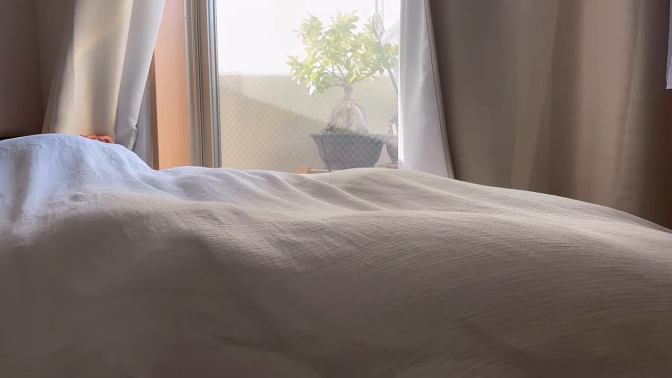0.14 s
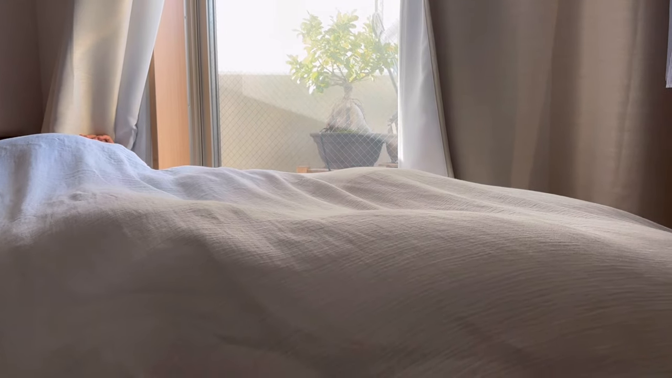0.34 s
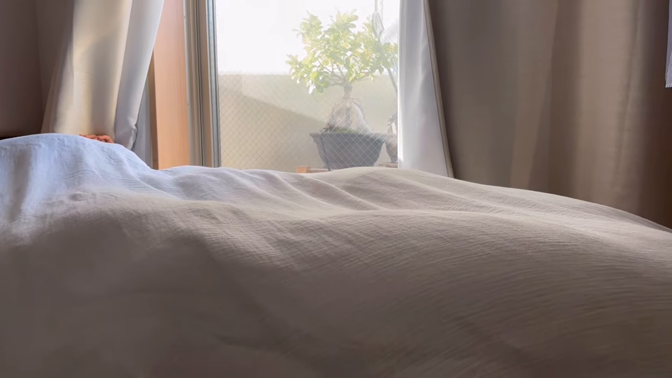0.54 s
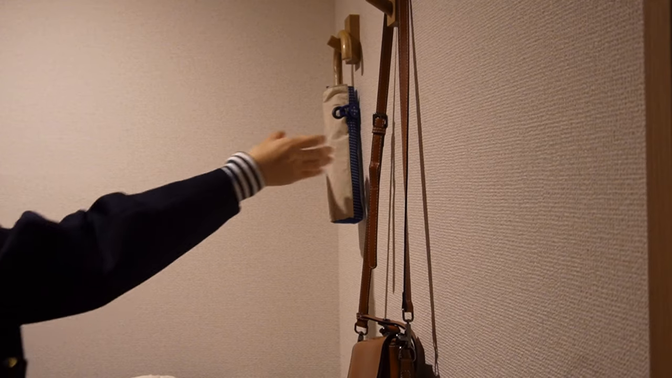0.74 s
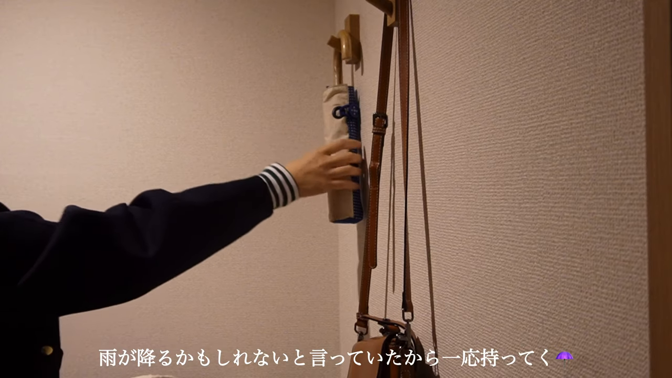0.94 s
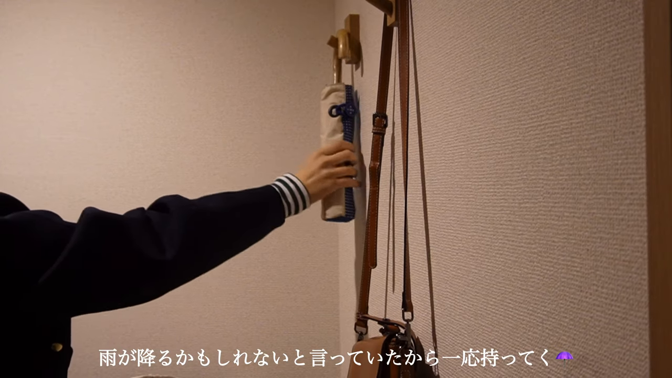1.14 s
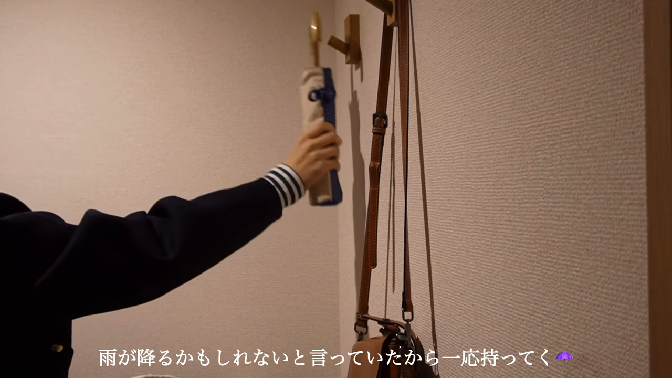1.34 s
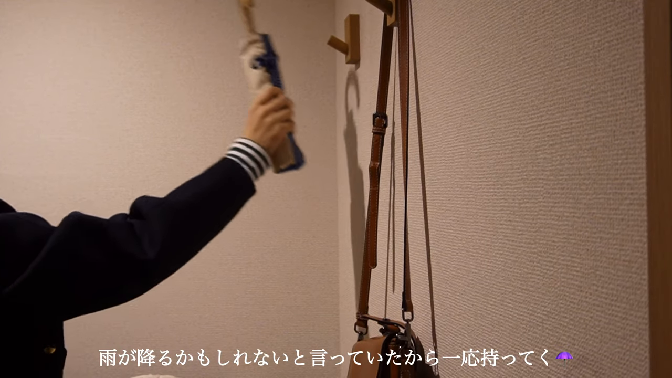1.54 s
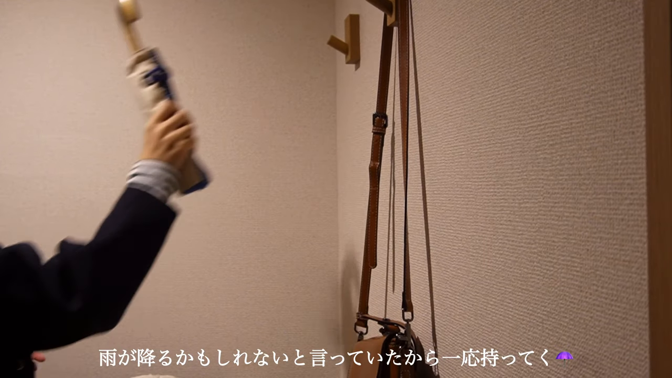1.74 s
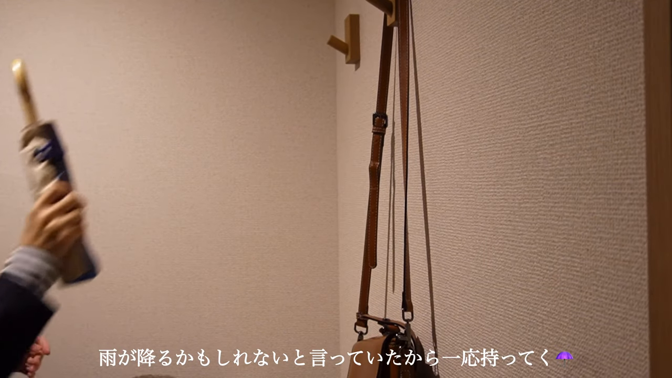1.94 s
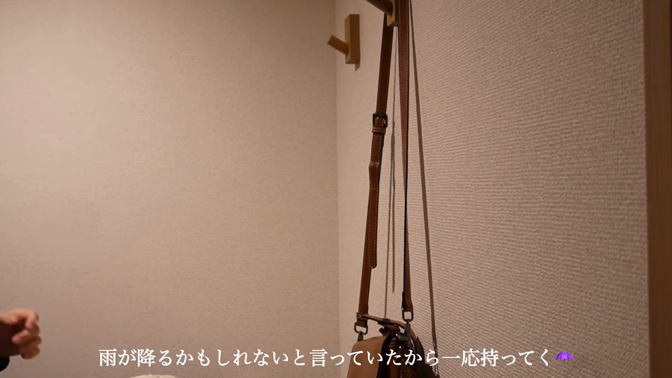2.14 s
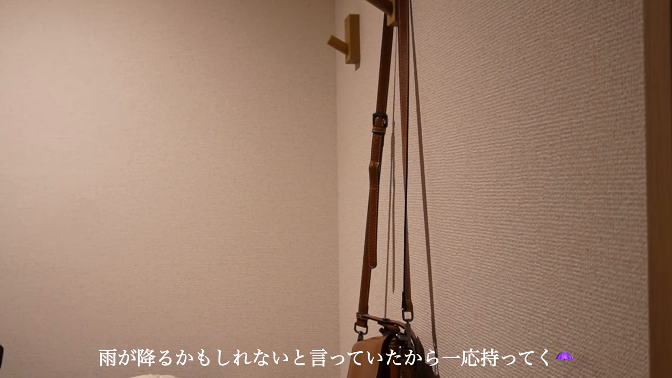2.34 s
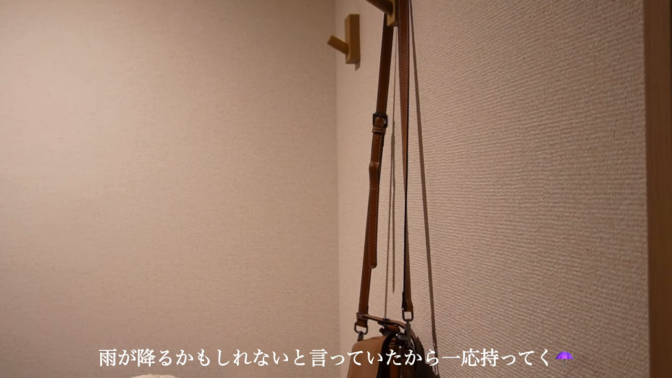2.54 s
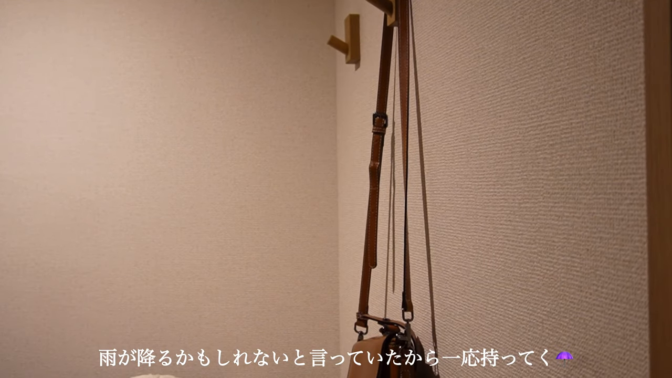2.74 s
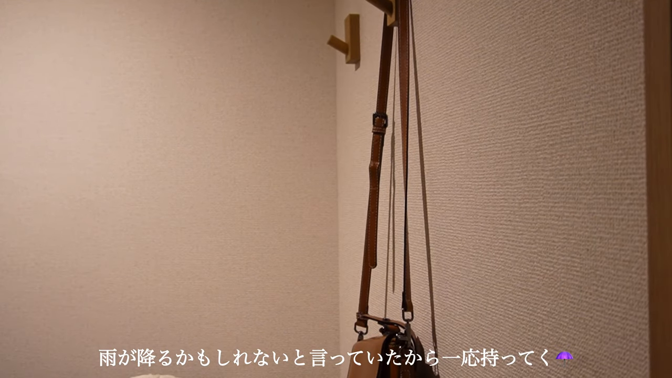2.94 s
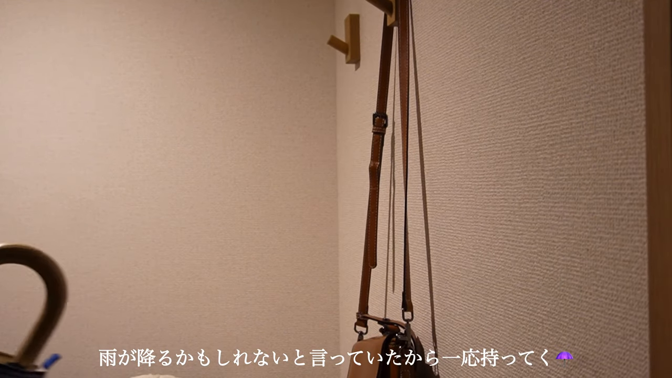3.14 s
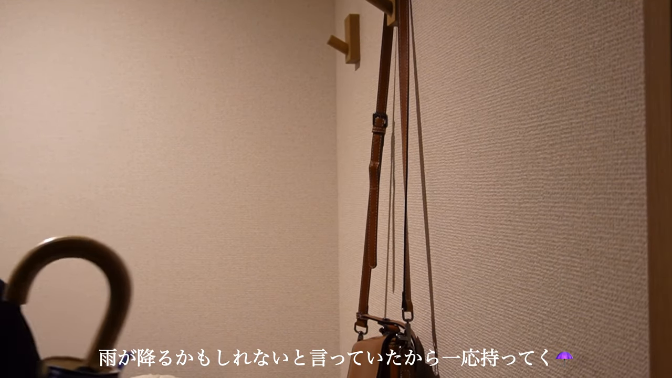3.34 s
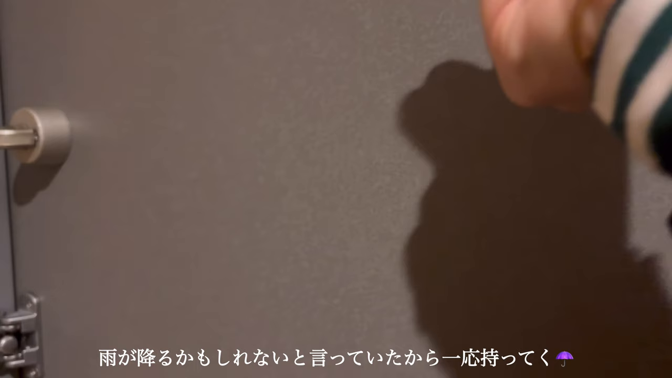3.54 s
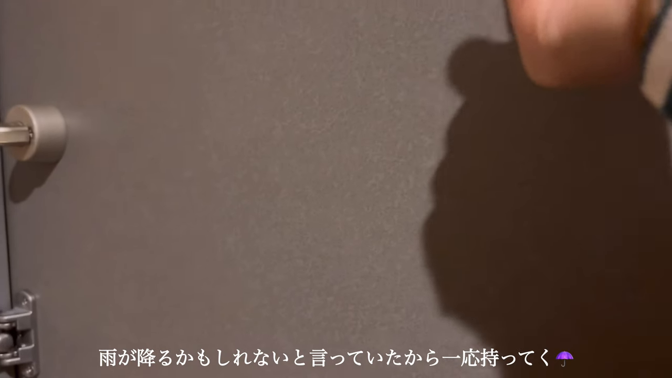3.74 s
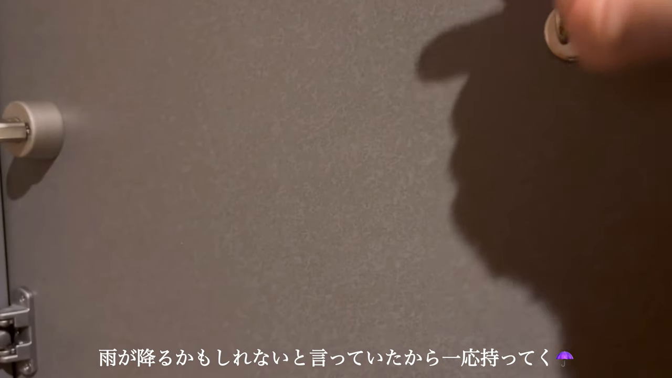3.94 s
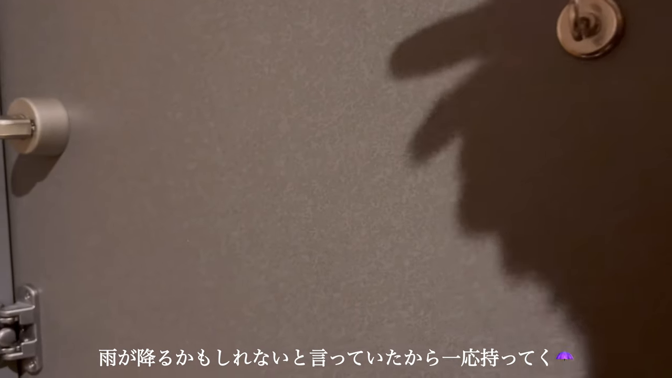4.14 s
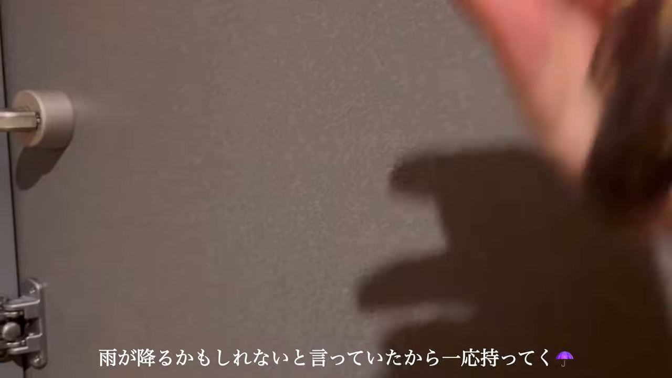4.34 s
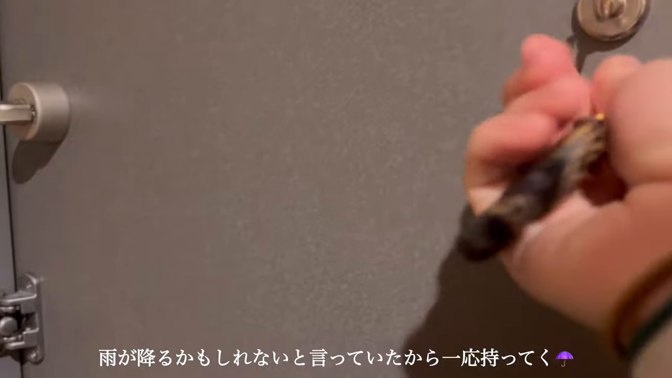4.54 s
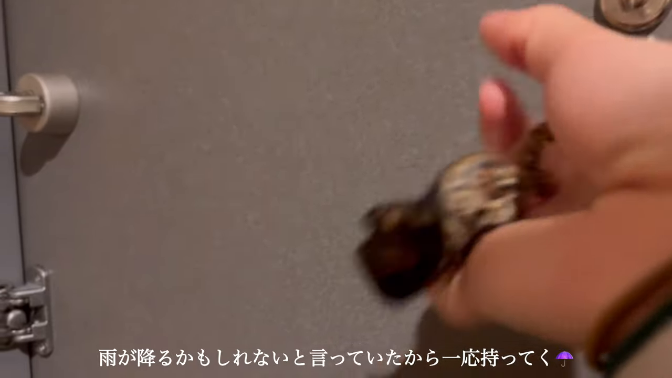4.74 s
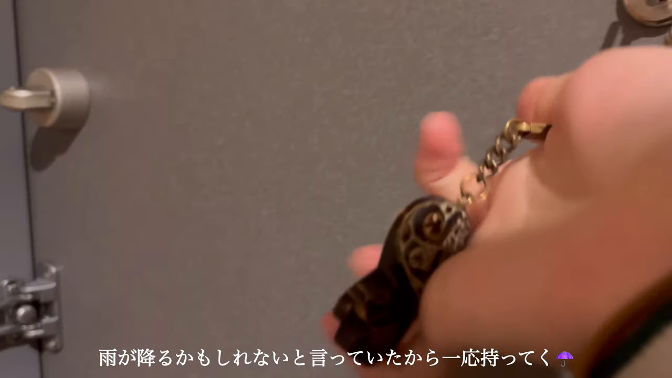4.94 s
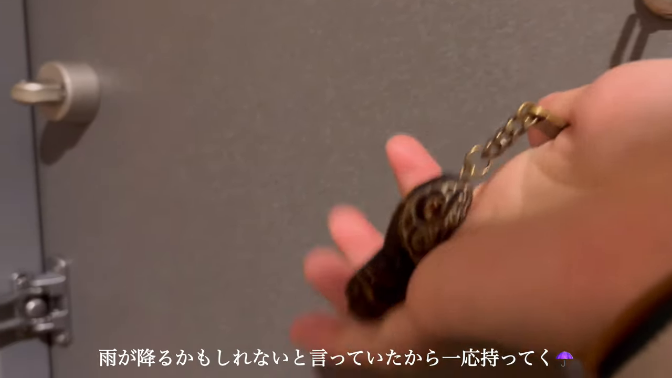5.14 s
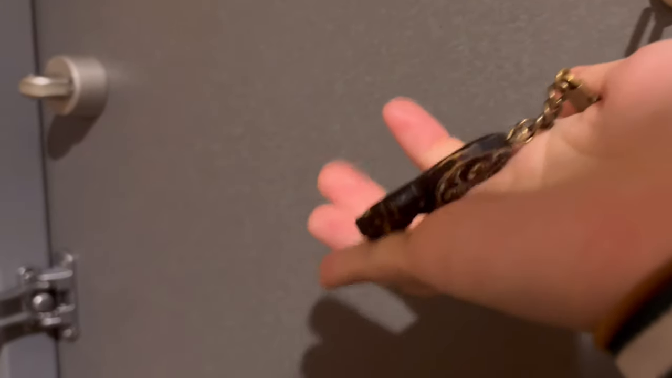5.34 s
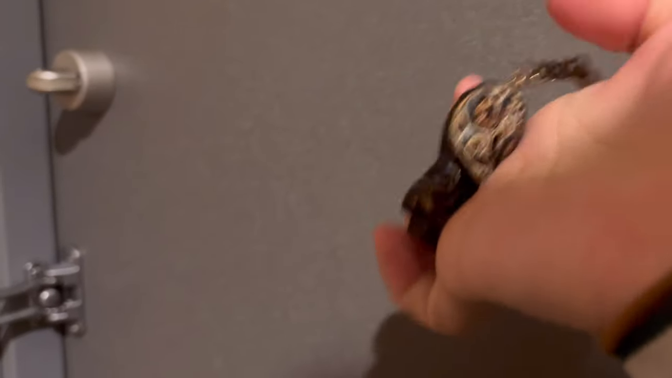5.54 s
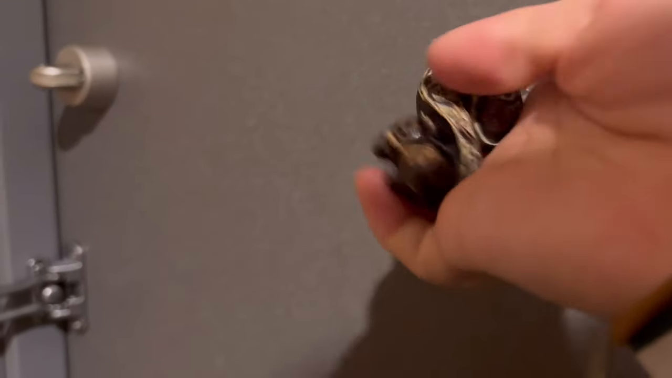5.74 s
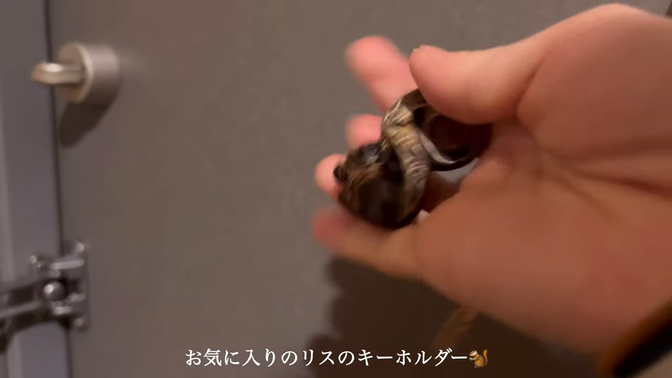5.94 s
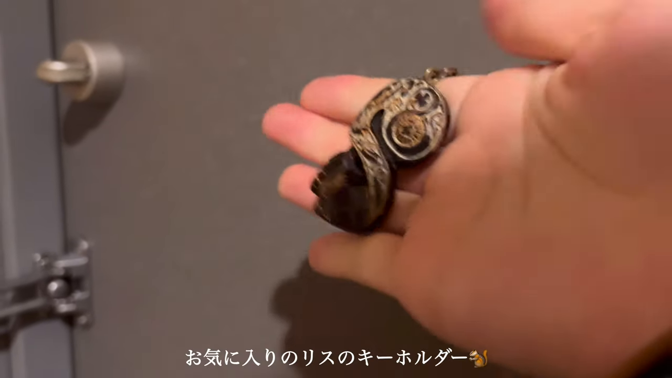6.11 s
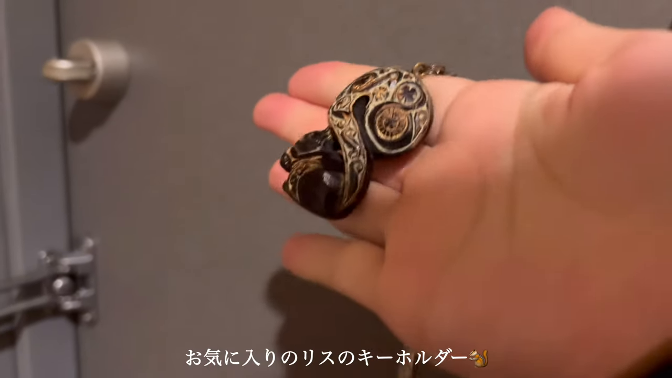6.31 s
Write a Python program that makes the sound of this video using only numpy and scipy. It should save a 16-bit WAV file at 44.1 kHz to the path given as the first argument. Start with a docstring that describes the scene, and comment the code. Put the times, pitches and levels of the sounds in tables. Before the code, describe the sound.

Inside a home, over a faint low rumble, cloth rubs and the floor thuds softly as someone moves and takes an umbrella off a wooden peg with a clack. At the front door, a bolt knocks and scrapes in its lock. Keys and their chain jingle in a hand near the microphone. The steel door gives a single booming bang, the loudest sound, and the keys rattle briefly, ending in tiny ticks.

```python
"""A home, in three scenes over a wavering low rumble. First a quiet bedroom. Then a hallway, where a
coat rustles, the floor answers a moving person and an umbrella taps a wooden peg as it is lifted off.
Last a steel front door: the turning lock knocks and scrapes, a bunch of keys jangles in the hand
close by, and a bang sets the whole door ringing."""
import sys
import numpy as np
from scipy import signal
from scipy.fft import rfft, irfft, next_fast_len
from scipy.io import wavfile
from scipy.ndimage import uniform_filter1d

SR = 44100
rng = np.random.default_rng(int(sys.argv[2]) if len(sys.argv) > 2 else 0)


def persist_wave(psi):
    """Save psi, clipped to +-1, as 16-bit WAV."""
    counts = np.round(np.clip(psi, -1, 1) * 32767).astype(np.int16)
    wavfile.write(sys.argv[1], SR, np.atleast_2d(counts).T)


N = 285327
T = np.arange(N) / SR


def gain(db):
    return 10 ** (np.asarray(db) / 20)


def set_level(x, db):
    return x * gain(db) / np.sqrt(np.mean(x ** 2))


def add(out, start_s, x):
    i = int(start_s * SR)
    out[..., i:i + x.shape[-1]] += x[..., :N - i]


def over_time(rows):
    """Join a table's points with straight lines, one curve per column."""
    times, *columns = np.transpose(rows)
    return [np.interp(T, times, column) for column in columns]


def at_pitch(table, hz):
    """Read between a table's frequencies, with octaves evenly spaced."""
    freqs, values = np.transpose(table)
    return np.interp(np.log(hz), np.log(freqs), values)


def wander(per_s):
    """A smooth random wobble."""
    hold = int(SR / per_s)
    steps = np.repeat(rng.standard_normal(N // hold + 1), hold)
    return uniform_filter1d(uniform_filter1d(steps, hold), hold)[:N]


def noise_bands(size, spread):
    """Half-octave slices of noise; spread(hz) sets how unlike left and right are."""
    n = next_fast_len(size)
    spectrum = rfft(rng.standard_normal((2, n)))
    freqs = np.arange(n // 2 + 1) * SR / n + 1
    for hz in 25 * 2 ** (np.arange(20) / 2):
        window = np.cos(np.pi * np.clip(np.log2(freqs / hz), -.5, .5)) ** 2
        mid, side = irfft(spectrum * window, n)[:, :size]
        yield hz, mid + spread(hz) * side * np.array([[1], [-1]])


def shaped_noise(tone, spread, flicker_db, level_db=lambda hz: 0):
    """Noise of strength 1 whose bands each flicker, then follow level_db(hz)."""
    parts = [(hz, x * gain(at_pitch(tone, hz) + flicker_db * wander(9)))
             for hz, x in noise_bands(N, spread)]
    strength = np.sqrt(np.mean(sum(x for _, x in parts) ** 2))
    return sum(x * gain(level_db(hz)) for hz, x in parts) / strength


def band(x, hz, width_hz):
    """Keep the sound near one pitch; filtering twice cuts more steeply."""
    peak = signal.iirpeak(hz, hz / width_hz, SR)
    return signal.lfilter(*peak, signal.lfilter(*peak, x))


def ring(tones, seconds, scatter_db):
    """The fading tones of a struck object. A fade time is how long a 60 dB drop takes."""
    t = T[:int(seconds * SR)]
    hz, db, fade_s = np.transpose(tones)[:, :, None]
    db = db + scatter_db * rng.standard_normal(hz.shape)
    sign = (-1) ** np.arange(len(tones))[:, None]  # neighbours swing opposite ways
    onset = 1 - np.exp(-hz * t)
    return np.sum(sign * gain(db - 60 * t / fade_s) * onset * np.sin(2 * np.pi * hz * t), 0)


def burst(fade_s):
    """A quick puff of noise whose energy depends only on its length."""
    fade = gain(-60 * np.arange(int(fade_s * SR)) / (fade_s * SR))
    puff = rng.standard_normal(len(fade)) * fade
    return puff * np.sqrt(np.sum(fade ** 2) / np.sum(puff ** 2))


def grit(depth_db, per_s):
    """Noise broken into tiny uneven slips."""
    hold = int(SR / per_s)
    slips = np.repeat(rng.exponential(size=N // hold + 1), hold)[:N]
    return set_level(rng.standard_normal(N) * gain(depth_db * np.minimum(slips, 4)), 0)


def swells(peaks, rise_db_s, fall_db_s, rest_db):
    """A resting level in dB, plus peaks that rise and fall at set speeds."""
    power = gain(rest_db) ** 2
    for s, db in peaks:
        power = power + gain(db - np.where(T < s, rise_db_s * (s - T), fall_db_s * (T - s))) ** 2
    return 10 * np.log10(power)


# How loud the rumble is: t/s, level/dB
RUMBLE_LEVELS = [(0, -64), (0.22, -65), (0.44, -70), (0.62, -64), (3.5, -55.5), (4.2, -44), (4.6, -47.5),
                 (5, -55), (5.6, -59), (6.2, -65), (6.45, -51)]
def rumble():
    """A deep rumble that wavers under all three scenes."""
    tone = [(25, -23), (60, 3), (110, 4.5), (200, -41)]  # f/Hz, level/dB
    level_db, = over_time(RUMBLE_LEVELS)
    return shaped_noise(tone, lambda hz: .35, .79, lambda hz: level_db)


# The bedroom air's mix of low and high: f/Hz, level/dB
BEDROOM_TONE = [(15, -38), (25, -28), (59, -2), (93, -18.5), (363, -25.5), (1860, -52), (15000, -82)]
def bedroom_air(start_db=-62, rise_db_s=10):
    """A faint, low hush that grows louder."""
    return shaped_noise(BEDROOM_TONE, lambda hz: .5, .75, lambda hz: start_db + rise_db_s * T)


# The cloth's mix of low and high: f/Hz, level/dB
CLOTH_TONE = [(240, -26), (400, -10.5), (1500, -2), (1690, -0.5), (2410, 1), (5200, 0), (10500, -17.5),
              (15700, -33.5)]
# The coat's movements: t/s, level/dB, brightening/dB
COAT_MOVES = [(0.69, -32, -4), (0.8, -30.5, -3.5), (0.98, -34.5, -4), (1.13, -31, -7), (1.22, -35, 0),
              (1.32, -37, -11), (1.5, -46, -5.5), (1.7, -42, -5), (1.89, -34, -0.5), (1.97, -34.5, 12),
              (2.09, -34.5, 4), (2.14, -40, 0), (2.22, -36.5, -6.5), (2.38, -45.5, -3), (2.5, -40, -4.5),
              (2.92, -36.5, -0.5), (3.15, -40, -4), (3.4, -36, -3.5), (3.5, -43.5, -3)]
def coat_rustle():
    """Cloth rubs, brighter when faster; fast strokes catch on the weave and scratch."""
    cloth_db, bright_db = over_time(COAT_MOVES)
    share = [(2500, .17), (6000, 1.18), (15000, 0)]  # f/Hz, share of the brightening
    rub = shaped_noise(CLOTH_TONE, lambda hz: .29 + hz / 30000, 1,
                       lambda hz: cloth_db + bright_db * at_pitch(share, hz))
    rub *= gain(1.02 * wander(150))
    slips = grit(3.1, 760)
    scratch = band(slips, 5450, 1900) + band(slips, 2360, 330) + gain(-14.5) * band(slips, 12600, 1500)
    return rub + gain(cloth_db + 2 * bright_db - 5.5) * scratch


# The low sound of floor and walls: f/Hz, level/dB
FLOOR_TONE = [(18, -36), (30, -16), (86, -4), (136, -2.5), (188, 6.5), (323, -4), (900, -10.5),
              (1170, -10.5), (1980, -120)]
# The person shifts weight: t/s, level/dB
WEIGHT_SHIFTS = [(1.0, -35.5), (1.1, -36), (1.3, -33), (1.97, -35.5), (2.45, -43)]
def floor_and_walls():
    """Floor and walls answer a moving person, swelling at each shift of weight."""
    level_db = swells(WEIGHT_SHIFTS, rise_db_s=192, fall_db_s=100, rest_db=-45.5)
    return shaped_noise(FLOOR_TONE, lambda hz: .2, 4.5, lambda hz: level_db)


def hallway_hiss():
    """A steady high hiss with a faint, thin whine."""
    hiss = set_level(band(rng.standard_normal((2, N)), 10000, 9000), db=-59)
    whine = set_level(band(rng.standard_normal(N), 10600, 60), db=-68)
    return hiss + whine


# The umbrella hits peg and wall: t/s, level/dB, extra treble/dB
UMBRELLA_TAPS = [(0.954, -31.5, 1), (1.046, -28, -7), (1.261, -18, 4.5), (3.19, -43.5, 8.5)]
# The wooden peg's tones: f/Hz, level/dB, fade/s
PEG_TONES = [(127.5, 5.5, 0.16), (243.7, 1, 0.32)]
def umbrella_taps():
    """Each tap rings the peg and adds a clack and a short click."""
    out = np.zeros(N)
    for s, db, treble_db in UMBRELLA_TAPS:
        add(out, s, gain(db - 4.5) * ring(PEG_TONES, .4, scatter_db=2))
        add(out, s, gain(db + treble_db + 8) * band(burst(.12), 1045, 1140))
        add(out, s, gain(db + treble_db + 12.5) * band(burst(.013), 1560, 1540))
    return out


# The doorway air's mix of low and high: f/Hz, level/dB
DOORWAY_TONE = [(15, -33), (25, -10), (95, -3), (184, -2), (266, -12.5), (767, -19.5), (9000, -56.5),
                (11700, -81), (19800, -120)]
def doorway_air():
    """The steady hush of still air by the front door."""
    return gain(-49.5) * shaped_noise(DOORWAY_TONE, lambda hz: .5, flicker_db=1.3)


# The steel door's main tones: f/Hz, level/dB, fade/s
DOOR_TONES = [(83.3, -5, 0.72), (146.8, -11, 0.97), (175.9, -6.5, 1), (205.5, -3.5, 0.87),
              (379.8, -0.5, 0.42), (434.4, -7.5, 0.43), (525.5, -0.5, 0.23), (870, -12, 0.34),
              (1002, -6, 0.18)]
# The boom of its many other tones and the stairwell: f/Hz, level/dB
BOOM_TONE = [(25, -46), (60, -10.5), (186, -6.5), (300, -6.5), (520, -10.5), (1010, -9.5), (1710, -26),
             (4090, -41), (8000, -53.5)]
# How long the boom lasts: f/Hz, fade/s
BOOM_FADES = [(60, 1.97), (160, 0.88), (420, 0.54), (1100, 0.24), (2910, 0.45)]
# The bolt's knocks, then the bang: t/s, level/dB, extra metal clash/dB
DOOR_BLOWS = [(3.554, -16.5, -21.5), (3.647, -14.5, -18), (3.679, -23.5, -28), (3.725, -15, -18),
              (3.754, -15, -13), (3.789, -16.5, -21), (3.864, -17.5, -8.5), (3.884, -16.5, -11),
              (3.909, -25.5, -30), (5.644, -1.5, -10), (5.649, -14, -20), (5.679, -23, -30),
              (5.724, -23, -38)]
def door_blows(push_samples=14):
    """Blows make the door ring and boom, the bass longest. Also returns their clash for the lock."""
    tail = sum(x * gain(at_pitch(BOOM_TONE, hz) - 60 * T[:SR] / at_pitch(BOOM_FADES, hz))
               for hz, x in noise_bands(SR, lambda hz: min(.12 + hz / 900, .9)))
    pushes, ringing, clash = np.zeros((3, N))
    for s, db, clash_db in DOOR_BLOWS:
        sign = rng.choice([-1, 1])
        add(pushes, s, gain(db - 40.5) * sign * np.hanning(push_samples))
        tones = ring(DOOR_TONES, .71, scatter_db=3.9)  # each blow lands on another spot
        add(ringing, s, gain(db - 14.5) * sign * tones)
        add(clash, s, gain(db + clash_db + 2.5) * burst(.13))
    boom = signal.fftconvolve(pushes[None], set_level(tail, 0))[:, :N]
    return boom + ringing, clash


# The bolt slides in the lock: t/s, level/dB
BOLT_SLIDES = [(3.73, -32), (3.78, -38.5), (3.885, -38.5)]
def lock_metal(clash):
    """The blows and the scraping bolt both shake the lock's metal."""
    scrape_db = swells(BOLT_SLIDES, rise_db_s=500, fall_db_s=251.5, rest_db=-120)
    shaking = clash + gain(scrape_db) * grit(3, 500)
    return band(shaking, 2140, 550) + gain(1) * band(shaking, 2670, 1520)


def ring_on(times, struck_db, held_db, fade_s, touch_db=1.5):
    """Level after each clink: a part is struck anew, or rings on, dulled by touch and grip."""
    levels = [struck_db[0]]
    for gap, struck, held in zip(np.diff(times), struck_db[1:], held_db[1:]):
        remaining = levels[-1] - 60 * gap / fade_s - touch_db
        levels.append(max(struck, min(held, remaining)))
    return np.array(levels)


# Low key, high key and two parts beside them, one list each: f/Hz, level/dB, fade/s
KEY_TONES = [
    [(5947, 0, .2), (1650, -30, .25), (13610, -14, .1), (12300, -16, .08), (7150, -20, .06)],
    [(11185, 0, .16)],
    [(10735, 0, .45), (4678, -12, 1.2), (5188, -13, .7)],
    [(15135, 0, 1.1)],
]
# Clinks in the bunch: t/s, click level/dB, low key level/dB, high key level/dB
KEY_CLINKS = [(4.098, -40.5, -78, -80), (4.172, -35, -70, -45), (4.183, -46, -60, -55),
              (4.206, -43, -68, -27), (4.229, -17.5, -20.5, -7.5), (4.244, -36, -22, -7),
              (4.265, -17, -16, -21.5), (4.281, -16, -16.5, -16), (4.294, -23, -8, -11.5),
              (4.302, -31, -19, -18), (4.311, -41, -29, -15.5), (4.347, -29.5, -40.5, -38.5),
              (4.376, -27, -52.5, -17), (4.428, -37, -66.5, -57.5), (4.446, -28.5, -40, -39.5),
              (4.518, -32, -54, -68), (4.648, -20, -60, -24.5), (4.679, -45, -43, -26),
              (4.705, -16, -62, -64), (4.722, -30, -79, -63), (4.773, -33.5, -75, -77),
              (4.807, -35.5, -77, -80), (5.055, -49.5, -77, -54), (5.229, -38, -83, -82),
              (5.392, -48.5, -77.5, -81), (5.428, -28.5, -74, -78.5), (5.506, -30.5, -50, -39),
              (5.626, -61, -52, -30), (5.639, -24.5, -33, -17), (5.68, -44, -33, -31.5),
              (5.736, -39, -44, -28.5), (5.753, -30.5, -46, -28), (5.773, -30, -38, -41),
              (5.787, -21.5, -26.5, -24.5), (5.816, -35, -44, -33), (5.833, -50, -35, -25.5),
              (5.857, -39, -45, -34), (5.97, -50.5, -60.5, -43), (6.197, -70, -70, -49.5),
              (6.37, -53.5, -73, -50)]
def key_ringing():
    """Each clink leaves the parts of the bunch ringing at a new level, louder or muted."""
    times, _, low_db, high_db = np.transpose(KEY_CLINKS)
    held_db = high_db - 5.5  # a hand that mutes the high key mutes its neighbours too
    beside_high_db = ring_on(times, high_db - 13, held_db, fade_s=KEY_TONES[2][0][2])
    beside_low_db = ring_on(times, low_db - 6, held_db, fade_s=KEY_TONES[3][0][2])
    latest = np.maximum(np.searchsorted(times, T) - 1, 0)
    age_s = np.abs(T - times[latest])
    out = np.zeros(N)
    for part, part_db in zip(KEY_TONES, [low_db, high_db, beside_high_db, beside_low_db]):
        for hz, db, fade_s in part:
            # weaker tones vary more with the spot that is struck
            start_db = part_db + db + .055 * db * rng.random(len(times))
            fade = (T > times[0]) * gain(start_db[latest] - 60 * age_s / fade_s + 3 * wander(80))
            out += uniform_filter1d(fade, size=130) * np.sin(2 * np.pi * hz * T + 1.2 * wander(60))
    return out


# Where the key chain rings: f/Hz, width/Hz, level/dB
CHAIN_BANDS = [(2930, 1600, -18.5), (4710, 2100, -7), (6730, 2400, 0), (9340, 1600, -0.5),
               (12400, 3500, -3.5), (14300, 3500, -1.5)]
# The hand shakes the bunch: t/s, level/dB
HAND_SHAKES = [(4.19, -34.5), (4.245, -32), (4.3, -25), (4.4, -39), (4.47, -45.5), (4.66, -33.5),
               (4.79, -41.5), (5.2, -69), (5.42, -53), (5.52, -49), (5.65, -26.5), (5.72, -35),
               (5.8, -32.5), (5.97, -61.5)]
def chain_rattle():
    """Shaken links slide over each other, and every key clink ticks through them."""
    slide = gain(swells(HAND_SHAKES, rise_db_s=696.5, fall_db_s=277.5, rest_db=-70))
    out = np.zeros(N)
    for hz, width_hz, band_db in CHAIN_BANDS:
        ticks = slide * grit(5.9, 1200)
        for s, db, *_ in KEY_CLINKS:
            scatter_db = 2 * rng.standard_normal()  # each contact favours other links
            add(ticks, s, gain(db + 12 + scatter_db) * burst(.011))
        out += gain(band_db - 2) * band(ticks, hz, width_hz)
    return out + gain(-4) * band(slide * grit(4, 1200), 3600, 3500)


# Small touches of the charm: t/s, level/dB
CHARM_TICKS = [(5.95, -49), (6.1973, -58), (6.2144, -63), (6.33, -64), (6.3644, -55.5)]
def charm_settling():
    """The charm on the bunch ticks softly as it settles in the palm."""
    out = np.zeros(N)
    for s, db in CHARM_TICKS:
        add(out, s, gain(db + 11) * band(burst(.13), 4200, 1670))
    return out


def close_echo(ticks):
    """The door and walls close by smear every tick."""
    echo = burst(.14)
    echo /= np.sqrt(np.sum(echo ** 2))
    return ticks + gain(-5) * signal.fftconvolve(ticks, echo)[:N]


# How far the left wave runs ahead of the right: f/Hz, lead/radians
LEFT_LEAD = [(0, -1), (4900, 1.5), (5900, -1.04), (6900, 1.05), (10100, -3.5), (13200, -6), (16200, -10.5)]
def to_stereo(x):
    """A close sound reaches two microphone openings slightly out of step."""
    n = next_fast_len(N)
    lead = np.interp(np.arange(n // 2 + 1) * SR / n, *np.transpose(LEFT_LEAD))
    return irfft(rfft(x, n) * np.exp(.5j * np.outer([1, -1], lead)), n)[:, :N]


def scene(hallway_start_s=.672, doorway_start_s=3.556):
    """Bedroom, hallway and doorway follow one another over the rumble."""
    low_rumble = rumble()
    bedroom = bedroom_air()
    hush = doorway_air()
    door, clash = door_blows()
    lock = lock_metal(clash)
    keys = close_echo(chain_rattle() + charm_settling()) + key_ringing()
    doorway = hush + door + to_stereo(lock + keys)
    hallway = coat_rustle() + floor_and_walls() + hallway_hiss() + umbrella_taps()
    after_bedroom = np.where(T < doorway_start_s, hallway, doorway)
    return low_rumble + np.where(T < hallway_start_s, bedroom, after_bedroom)


def record(dry, top_hz=15900):
    """Round off the loudest peaks and cut the highest treble."""
    treble_cut = signal.ellip(8, .2, 70, top_hz, fs=SR, output="sos")
    return signal.sosfilt(treble_cut, np.tanh(dry))


dry = scene()
out = record(dry)
persist_wave(out)
```